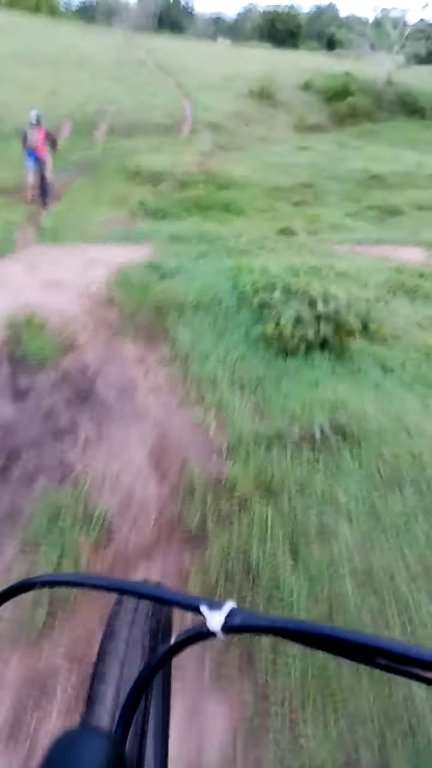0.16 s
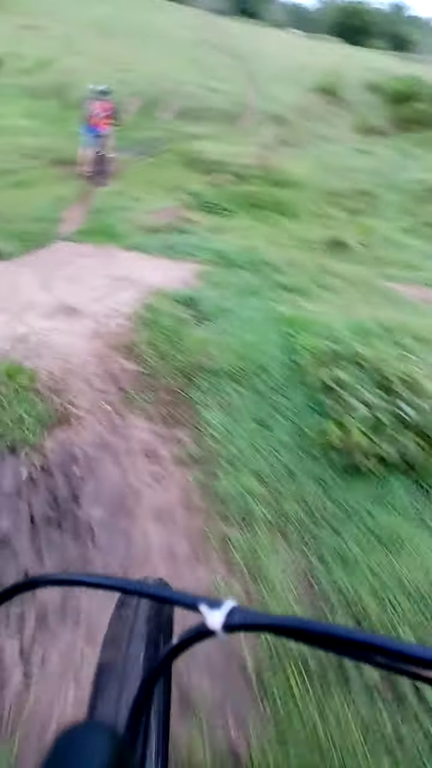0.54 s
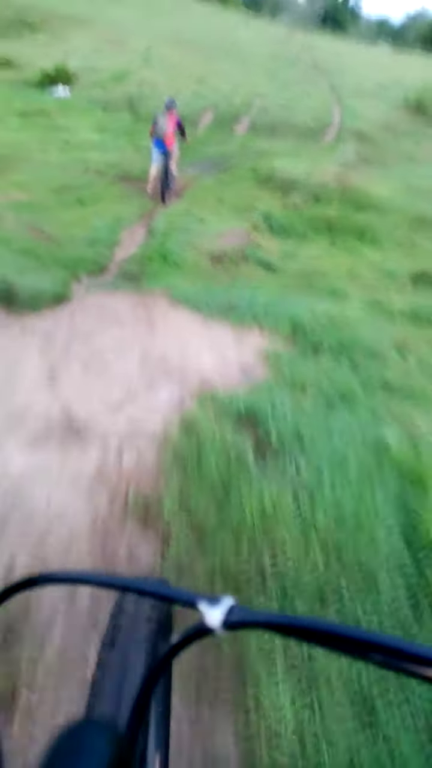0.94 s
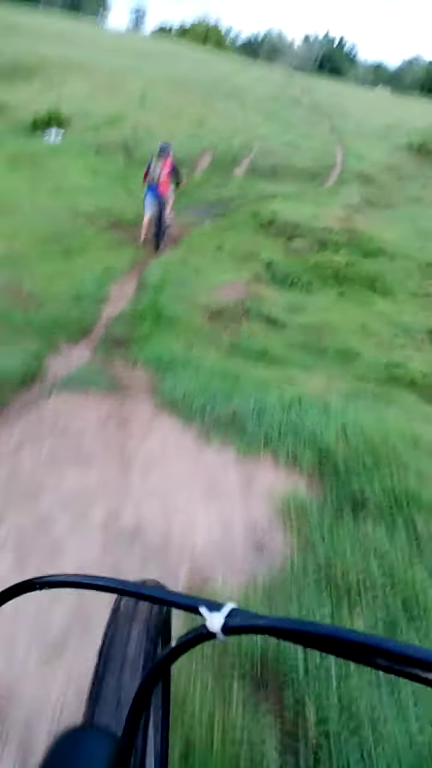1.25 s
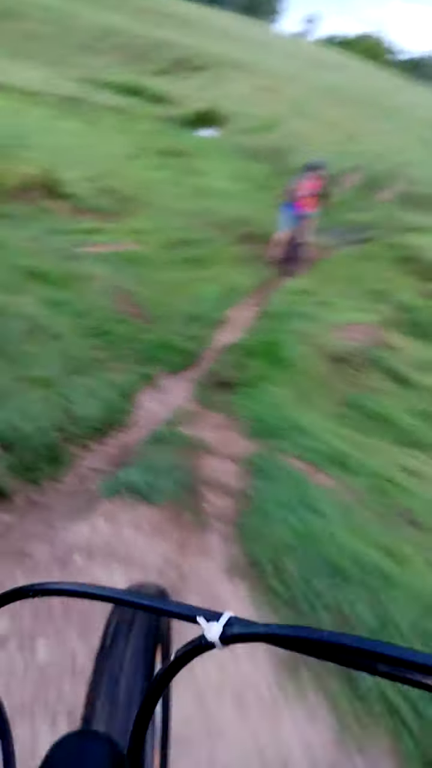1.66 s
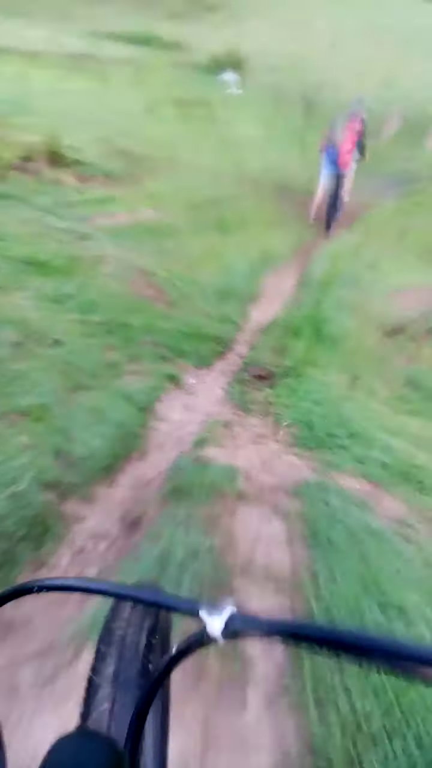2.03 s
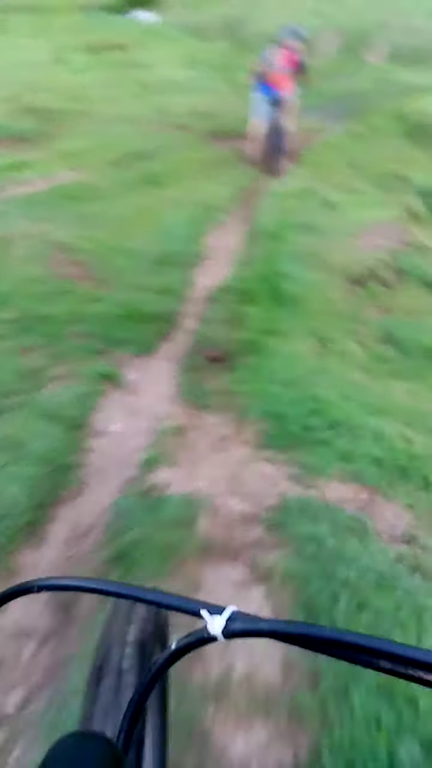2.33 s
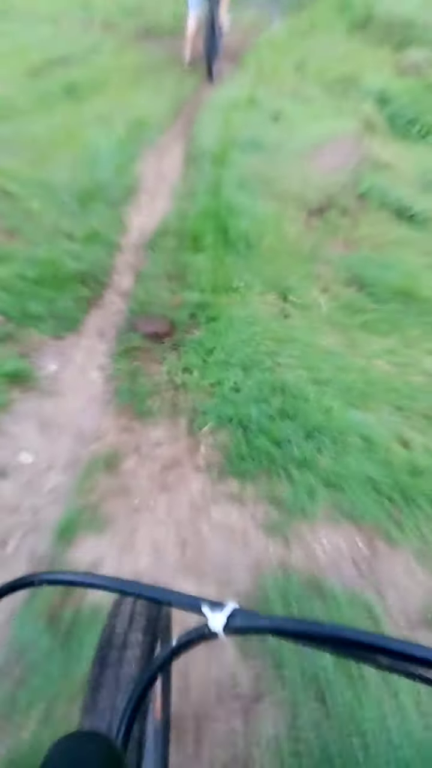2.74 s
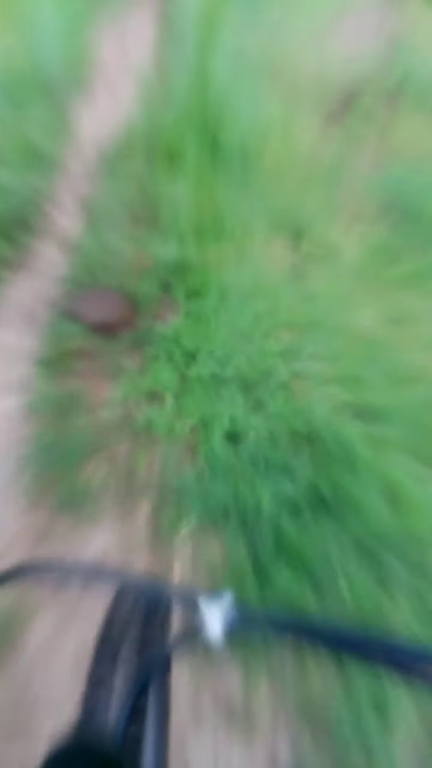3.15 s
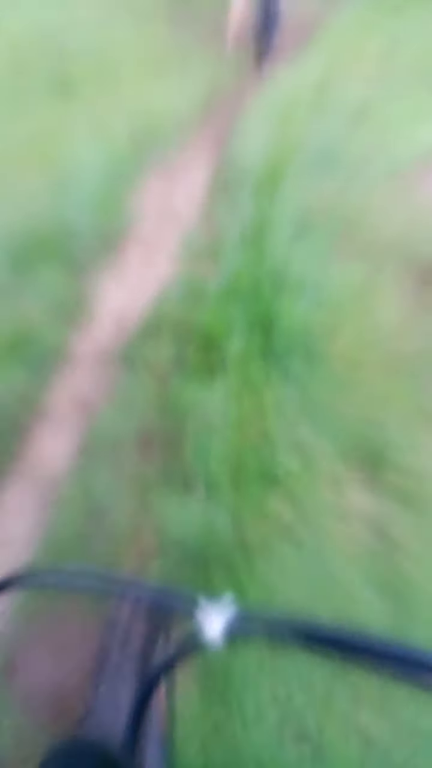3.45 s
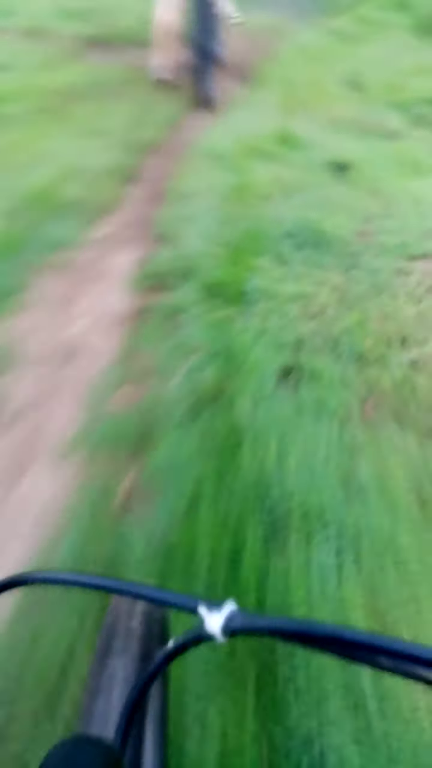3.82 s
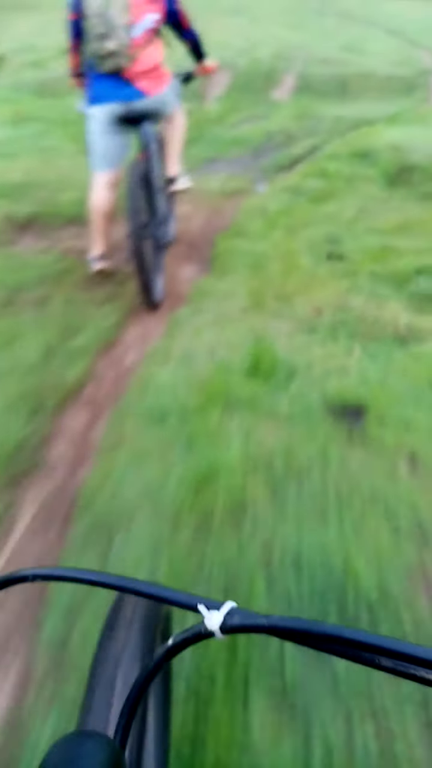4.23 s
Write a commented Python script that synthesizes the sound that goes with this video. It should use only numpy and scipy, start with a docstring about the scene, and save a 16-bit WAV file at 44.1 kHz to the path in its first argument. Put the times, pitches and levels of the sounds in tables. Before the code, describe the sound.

Coasting mountain bike on a dirt trail: quick uneven ticking, low wind buffeting, then shrill stuttering brake squeals with late cracks and thuds.

```python
"""Wind buffets two microphone ports, the left one covered, while tyres hiss and scuff on a dirt trail. A
freewheel ticks throughout at an uneven pace, slower later: decaying noise clusters ring the hub resonances.
Then a disc brake squeals on two rotor modes, wavering sines with an octave and difference tones; it clips the
right input and turns down wind, tyres and ticks. Stones and stalks crack and thud on the frame, and a knock of
wind strikes the ports at 1.51 s."""
import sys
import numpy as np
from scipy import signal
from scipy.fft import rfft, irfft, next_fast_len
from scipy.io import wavfile
from scipy.ndimage import uniform_filter1d, map_coordinates

SR = 44100
rng = np.random.default_rng(int(sys.argv[2]) if len(sys.argv) > 2 else 0)


def wav_record(signal):
    """Record a signal, one row per channel, as 16-bit PCM in the file named by sys.argv[1]."""
    frames = np.transpose(np.atleast_2d(signal))
    bounded = np.clip(frames, -1, 1)
    # unit amplitude maps onto the largest positive 16-bit level
    quanta = np.round(bounded * 32767).astype(np.int16)
    wavfile.write(sys.argv[1], SR, quanta)


def convert_level_to_amplitude(level_db):
    """Map a level in decibels to its linear amplitude factor."""
    exponent = np.asarray(level_db, float) / 20
    return 10 ** exponent


N = 193333
LEFT_LEAD_SAMPLES = 21  # near sounds reach the left port earlier


def unit(x):
    """Scaled to rms 1."""
    return x / np.sqrt(np.mean(x ** 2, axis=-1, keepdims=True) + 1e-20)


def curves(rows):
    """One value per sample for each column after the time."""
    s, *cols = np.transpose(rows)
    return [np.interp(np.arange(N) / SR, s, c) for c in cols]


def wobble(rate_hz, channels=1):
    """Smooth random curves, rate_hz knots a second."""
    knots = rng.standard_normal((channels, N // 40))
    return np.array([map_coordinates(k, [np.arange(N) * rate_hz / SR]) for k in knots])


def bells(rows):
    """Sum of bell-shaped swells from (centre_s, level_db, half_width_ms) rows; half-width to 1/e, 3 ms or more."""
    t = np.arange(N) / SR
    return sum(convert_level_to_amplitude(db) * np.exp(-((t - s) * 1000 / max(ms, 3)) ** 2) for s, db, ms in rows)


def filtered(x, response):
    """x times a response of frequency."""
    m = next_fast_len(x.shape[-1] + 8192)
    return irfft(rfft(x, m) * response(np.fft.rfftfreq(m, 1 / SR)), m)[..., :x.shape[-1]]


def coloured(x, points):
    """x through (freq_hz, gain_db) points on a log axis."""
    f, db = np.transpose(points)
    return filtered(x, lambda hz: convert_level_to_amplitude(np.interp(np.log(hz + 1), np.log(f + 1), db)))


def ports(x, alike):
    """A near sound (two draws) at the covered left port, early and dull, and at the right one."""
    # left port's response: freq_hz, gain_db
    covered = [(300, 10), (1000, -4.5), (3000, -7.5), (7000, -12), (8000, -13), (9300, -9), (11000, -16),
               (13000, -38), (15000, -28.5)]
    alike = np.clip(alike, 0, 1)
    left = np.roll(alike * x[1] + np.sqrt(1 - alike ** 2) * x[0], -LEFT_LEAD_SAMPLES)
    return np.array([coloured(left, covered), x[1]])


def wind():
    """Turbulence buffets each port on its own, in lumps; gusts on the right port raise its low band and the top."""
    # wind level: time_s, left_db, right_db
    wind_levels = [(0.02, -40.5, -37.5), (0.3, -51, -36), (0.7, -48, -33), (1.05, -45, -39),
                   (1.35, -41.5, -41.5), (1.8, -49, -40), (2.1, -42, -33.5), (2.5, -56.5, -36),
                   (2.75, -45, -33.5), (2.9, -37, -27.5), (3.0, -36, -29), (3.18, -32, -29),
                   (3.6, -25, -30), (3.78, -52, -31), (3.95, -35, -27.5), (4.1, -33, -53),
                   (4.36, -44, -32.5)]
    # added swells on the right port: centre_s, level_db, half_width_ms
    gusts = [(.46, -46.5, 16), (.54, -38, 85), (.78, -33, 13), (1.47, -33.5, 18.6), (2.61, -29.5, 17),
             (3.08, -22, 38), (3.66, -23.5, 15.8), (3.70, -15.5, 17.3), (3.74, -11.5, 30.4),
             (4.01, -12, 6.7), (4.15, -23, 100)]
    # spectrum of the low buffeting: freq_hz, gain_db
    buffet = [(15, -50.5), (25, -33), (93, 4.5), (194, 0), (233, -2.5), (436, -14.5), (617, -48),
              (700, -50), (910, -56.5), (1540, -120)]
    # spectrum of the gusts' upper band: freq_hz, gain_db
    gust_top = [(250, -30.5), (420, 2), (700, -9), (1200, -19.5), (2000, -47)]
    left_db, right_db = curves(wind_levels)
    right_db = 20 * np.log10(convert_level_to_amplitude(right_db) + bells(gusts))
    lumps_db = 6 * np.tanh(0.47 * wobble(16, channels=2) + 0.85 * wobble(50, channels=2))
    low = unit(convert_level_to_amplitude(lumps_db) * coloured(rng.standard_normal((2, N)), buffet))
    top = unit(convert_level_to_amplitude(lumps_db) * coloured(rng.standard_normal((2, N)), gust_top))
    right_top_db = -39 + 1.525 * (right_db + 23.5)  # swings wider than the wind
    left_top_db = right_top_db + 2 + 0.94 * (left_db - right_db)  # the top follows the port that is hit
    return convert_level_to_amplitude([left_db, right_db]) * low + convert_level_to_amplitude([left_top_db, right_top_db]) * top


def tyres():
    """Tyres roll over dirt: coloured noise with a gritty random level."""
    # tyre noise before the 8 dB lift: time_s, level_db
    roll = [(0, -58.5), (1.47, -58), (1.53, -52), (2.4, -53), (2.55, -58), (2.65, -56), (3.0, -49),
            (3.08, -33), (3.18, -48.5), (3.4, -41), (3.64, -40), (3.74, -49), (4.05, -50), (4.15, -44.5),
            (4.36, -50)]
    # hiss spectrum: freq_hz, gain_db
    hiss = [(400, -17), (1000, -13.5), (1900, -7.5), (2800, -14.5), (5300, -9), (6500, -3), (7800, -9),
            (10000, -7), (11500, -25.5), (13200, -20.5), (14800, -4), (15800, -20)]
    grit = convert_level_to_amplitude(2.5 * wobble(25.02) + 2.4 * wobble(400)) * rng.standard_normal((2, N))
    return ports(convert_level_to_amplitude(curves(roll)[0] + 8.0) * unit(coloured(unit(grit), hiss)), alike=0.11)


def scuffs():
    """The tyre drags on bare dirt: a raspy noise band with a half-sine swell."""
    # drags: start_s, length_s, level_db
    drags = [(-.04, 0.12, -43), (0.858, 0.13, -41.5), (4.07, 0.046, -41)]
    t = np.arange(N) / SR
    size = sum(convert_level_to_amplitude(db) * np.sin(np.pi * np.clip((t - s) / length, 0, 1)) for s, length, db in drags)
    rasp = convert_level_to_amplitude(4.9 * wobble(120)) * rng.standard_normal((2, N))
    band = coloured(rasp, [(900, -14.5), (1500, -16.0), (1800, -7.5), (2200, -19.5), (3500, -29.0)])
    return ports(size * unit(band), alike=0.6)


def freewheel():
    """Each tick is a short cluster of pawl contacts, decaying noise that rings the hub's resonances."""
    # uneven wheel pace, slower later: time_s, teeth_passed
    teeth_passed = [(0, .2), (.037, 1), (.222, 5), (.35, 8), (.55, 12), (.956, 21), (1.112, 25),
                    (1.237, 28), (1.4, 32), (1.447, 33), (1.964, 42), (2.172, 46), (2.358, 49), (2.566, 53),
                    (2.87, 58), (4.042, 79), (4.38, 85.3)]
    # hub resonances, signs alternating: centre_hz, width_hz, gain_db
    resonances = [(2340, 1940, -16.5), (5190, 100, -3.5), (6403, 223, 2.5), (8750, 440, -21),
                  (12700, 2700, -44), (15160, 220, -1.5)]
    t, out = np.arange(1200) / SR, np.zeros((2, N + 1200))
    at, teeth = np.transpose(teeth_passed)
    for s in np.interp(np.arange(1, teeth[-1]), teeth, at):
        second_s, db = rng.uniform(0.0037, 0.011), rng.normal(-28.0, 1.44)
        shape = convert_level_to_amplitude(-60 * t / 0.025) + 1.54 * convert_level_to_amplitude(-60 * np.abs(t - second_s) / 0.02)
        i = round(s * SR)
        out[:, i:i + len(t)] += convert_level_to_amplitude(db) * shape * rng.standard_normal((2, len(t)))

    def hub(f):
        return sum((-1) ** k * convert_level_to_amplitude(db) * 1j * f * w / (c * c - f * f + 1j * f * w)
                   for k, (c, w, db) in enumerate(resonances))

    return ports(filtered(out[:, :N], hub), alike=0.69)


def sag():
    """Share by which the pad's pressure pulls the rotor modes down; each press comes to a rounded point."""
    # presses, sag of the lower mode: centre_s, sag_percent, half_width_ms
    presses = [(1.483, 6.4, 85), (1.639, 8.4, 32), (1.709, 1.5, 10), (1.819, 5.2, 87), (1.83, 3.0, 9),
               (2.038, 2.1, 22), (2.188, 3.3, 44), (2.426, 1.7, 100), (2.436, 1.4, 14), (2.633, 2.8, 18),
               (2.797, 3.0, 25), (2.936, 3.5, 23), (2.969, 1.2, 11), (3.087, 2.9, 17), (3.209, 2.7, 25),
               (3.325, 3.1, 17), (3.397, 2.1, 15), (3.483, 1.9, 60), (3.578, 4.8, 20), (3.686, 3.3, 24),
               (3.757, 5.3, 29), (3.855, 3.0, 28), (3.944, 5.0, 20), (4.034, 6.7, 18), (4.142, 5.7, 27),
               (4.214, 11.0, 18)]
    t = np.arange(N) / SR
    return sum(share / 100 * np.exp(-np.sqrt(((t - s) * 1000 / ms) ** 2 + 0.02)) for s, share, ms in presses)


def mode(grabs, pitch_hz, flutter_db, jitter_hz, left_db):
    """Phase, right size and complex left gain of a squealing mode: each pad grab is a bell-shaped swell."""
    hz = pitch_hz + jitter_hz * (wobble(40)[0] + 1.5 * wobble(200)[0])  # the pad grips unevenly
    grip_db = flutter_db * wobble(170)[0] + 3 * np.tanh(wobble(80)[0])
    size = np.sqrt(2) * bells(grabs) * convert_level_to_amplitude(grip_db)
    size = 0.62 * np.tanh(size / 0.62)  # largest swing a mode reaches
    paths = 0.4 + 0.46 * wobble(35)[0] + 0.6j * wobble(64)[0]  # several shifting paths meet at the left port
    return 2 * np.pi * np.cumsum(hz) / SR, size, convert_level_to_amplitude(left_db) * paths


def overload(waves):
    """Crests cut on the input's own sample clock: high overtones and sums fold down into thin crossing lines."""
    # clipping spells of the right input: start_s, length_s
    spells = [(2.018, .006), (2.05, .011), (2.371, .008), (2.383, .004), (2.432, .028), (2.642, .014),
              (2.75, .008), (2.81, .004), (2.962, .016), (3.08, .031), (3.323, .02)]
    input_hz, crest_cut = 48000, 0.115  # crest_cut: share of the crest lost
    at = np.arange(round(N * input_hz / SR)) * SR / input_hz

    def read(v):
        return np.interp(at, np.arange(N), v)

    share = 0
    for s, length in spells:
        arch = np.sin(np.pi * np.clip((at / SR - s) / length, 0, 1))
        share = share + crest_cut * np.clip(3 * arch, 0, 1)
    wave = sum(read(size) * np.sin(read(phase)) for phase, size in waves)
    crest = sum(read(size) for phase, size in waves)
    lost = np.minimum((1 - share) * crest - wave, 0)
    return convert_level_to_amplitude(7) * signal.resample_poly(lost, 147, 160)[:N]


def brake():
    """Two squealing rotor modes, the octave of the lower one, difference tones and the right input's overload."""
    # pad grabs on the lower mode, before flutter and limit: centre_s, level_db, half_width_ms
    low_grabs = [(1.52, -13, 12.4), (1.551, -9.5, 18.8), (1.638, -15.5, 73.5), (1.671, -3, 1.6),
                 (1.696, -8.5, 4.8), (1.719, -9.5, 8.4), (1.832, -15.5, 13.2), (1.858, -7, 8),
                 (1.89, -34, 70), (1.898, -11.5, 27.3), (2.068, -20, 26.4), (2.098, -18, 6.5),
                 (2.207, -10, 12.6), (2.231, -16, 44.0), (2.295, -31.5, 4.8), (2.66, -19.5, 30.2),
                 (2.815, -41, 97), (3.25, -12.5, 17.2), (3.42, -26.5, 30), (3.486, -8.5, 7.9),
                 (3.518, -9, 13.7), (3.583, -10.5, 33.5), (3.679, -20.5, 33.4), (3.687, -5, 4.2),
                 (3.738, -5.5, 1.8), (3.765, -10.5, 44.7), (3.925, -9, 36.8), (3.979, -10, 4.3),
                 (4.015, -11.5, 21), (4.044, -14, 9.6), (4.073, -18, 11.5), (4.188, -27.5, 59),
                 (4.195, -16.4, 8.2)]
    # pad grabs on the upper mode, likewise: centre_s, level_db, half_width_ms
    high_grabs = [(2.015, -13, 21.7), (2.054, -8, 8.4), (2.128, -25, 4.7), (2.137, -36.5, 32),
                  (2.338, -18, 12.4), (2.384, -14.5, 44), (2.445, -10.5, 16.3), (2.493, -22, 1.4),
                  (2.522, -43.0, 28), (2.635, -18, 30.8), (2.714, -14.5, 10.6), (2.753, -12, 5.0),
                  (2.761, -21.5, 52.5), (2.808, -17.5, 19), (2.869, -25.5, 17), (2.909, -18.5, 9.8),
                  (2.968, -13.5, 16.7), (3.023, -29, 25), (3.092, -10.5, 17.4), (3.169, -13.5, 27.8),
                  (3.235, -21.6, 4.3), (3.304, -12.5, 2), (3.319, -11.5, 30.7), (3.375, -12.5, 8.2),
                  (3.412, -9, 2.6), (3.437, -28, 71), (3.503, -11.5, 2.6), (3.846, -21, 8.0),
                  (3.872, -17.5, 4.8)]
    # lower mode's octave at the right port, before drive and rasp: time_s, level_over_mode_db
    octave_levels = [(1.5, -19.5), (2.1, -14.5), (3.3, -20), (3.55, -11), (4.2, -15.5)]
    drop = sag()
    low, low_size, low_left = mode(low_grabs, 7470 * (1 - drop), flutter_db=0.8, jitter_hz=24, left_db=-11)
    high, high_size, high_left = mode(high_grabs, 8875 * (1 - 1.27 * drop), flutter_db=1.2, jitter_hz=11,
                                      left_db=-10)
    tones = np.array([low_size * np.exp(1j * low), high_size * np.exp(1j * high)])
    # pad grain: a fuzzy skirt on each line
    tones *= 1 + 0.055 * (wobble(600, channels=2) + 1j * wobble(600, channels=2))
    out = np.array([low_left * tones[0] + high_left * tones[1], tones.sum(0)]).imag

    rasp = 1 + 0.86 * wobble(280)[0]  # the octave is rougher than the mode
    octave_size = low_size * np.tanh(low_size / 0.053) * convert_level_to_amplitude(curves(octave_levels)[0]) * rasp
    octave_phase = 2 * low + [[1.5], [0.6]] * wobble(150, channels=2)
    out += octave_size * convert_level_to_amplitude([[-31], [0]]) * np.sin(octave_phase)

    both = (low_size * high_size) ** 0.53  # the modes mix only while both sound
    out += convert_level_to_amplitude([[-40], [-27]]) * both * rasp * np.sin(high - low)
    out[1] += convert_level_to_amplitude(-29) * both * rasp * (np.sin(2 * low - high) + np.sin(2 * high - low))

    folded = overload([(low, low_size), (high, high_size)])
    out[1] += coloured(folded, [(40, -35), (300, 9), (1200, 9.5), (3500, 9.0), (6000, 13), (12000, -3.5)])
    return out


def jolts():
    """Stones and stalks strike the frame, and at 1.51 s a knock of wind hits the ports: gritty crack and low
    thud of decaying noise, near equal at both ports."""
    # strikes (the first a wind knock on the ports), thud relative to crack before a 16.5 dB lift: start_s,
    # crack_db, thud_db, crack_t60_s
    strikes = [(1.5103, -40.5, -11.5, 0.011), (3.025, -49.5, 27, 0.018), (3.0456, -44, 20, 0.013),
               (3.2293, -40, 12, 0.029), (3.3594, -33.5, 12, 0.081), (3.4119, -29.5, 6, 0.012),
               (3.4277, -28.5, 4, 0.021), (3.4317, -19, -13.5, 0.036), (3.4505, -23, 2, 0.025),
               (3.4656, -39, 9, 0.079), (3.5449, -34.5, 0.5, 0.036), (3.5505, -30, 11, 0.096),
               (3.6887, -43.5, 22.5, 0.022), (3.8482, -41, 6, 0.19), (4.078, -46, 21, 0.0087)]
    # crack spectrum: freq_hz, gain_db
    crack_colour = [(300, -14), (1000, 5), (3000, -3), (7000, 5), (11000, -7), (15500, -49)]
    t = np.arange(6000) / SR
    crack, thud = np.zeros((2, N + 6000)), np.zeros((2, N + 6000))
    for s, db, thud_db, t60 in strikes:
        noise = rng.standard_normal((3, len(t)))  # row 0 is common to both ports
        shape = convert_level_to_amplitude(-60 * t / t60) + 0.66 * convert_level_to_amplitude(-60 * t / 0.0055)
        i = round(s * SR)
        crack[:, i:i + len(t)] += convert_level_to_amplitude(db) * shape * (noise[0] + 2.14 * noise[1:])
        thud[:, i:i + len(t)] += convert_level_to_amplitude(db + thud_db + 16.5 - 60 * t / 0.11) * noise[1:]
    both = coloured(crack[:, :N], crack_colour)
    both += coloured(thud[:, :N], [(20, -51.5), (50, -8.5), (120, 5), (400, -2), (900, -34.0)])
    left = coloured(both[0], [(6000, 2), (10000, -5.5), (13000, -25.0)])
    return np.array([convert_level_to_amplitude(-4.0) * np.roll(left, -LEFT_LEAD_SAMPLES), both[1]])


def scene():
    """The gain control follows the right port's squeal and turns wind, tyres and ticks down."""
    ride = wind() + tyres() + freewheel()
    squeal = brake()
    loud = np.sqrt(np.abs(uniform_filter1d(squeal[1] ** 2, round(0.035 * SR))))  # rms over 35 ms
    gain = (1 + loud / convert_level_to_amplitude(-25)) ** -0.75
    return squeal + gain * ride + jolts() + scuffs()


def top_cut(x):
    """Nothing passes above the cut-off."""
    return signal.sosfilt(signal.butter(12, 16250, fs=SR, output="sos"), x)


def record(dry):
    """Band limit: the mix keeps nothing from 15.9 kHz up."""
    mix = filtered(dry, lambda hz: hz < 15900)
    return top_cut(mix)


dry = scene()
out = record(dry)
wav_record(out)
```